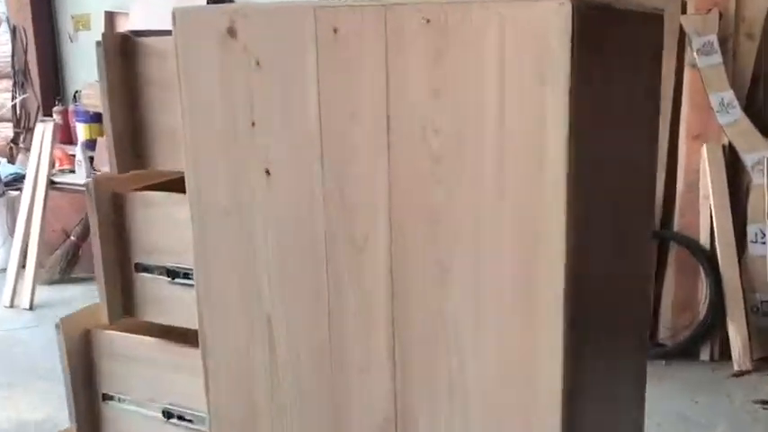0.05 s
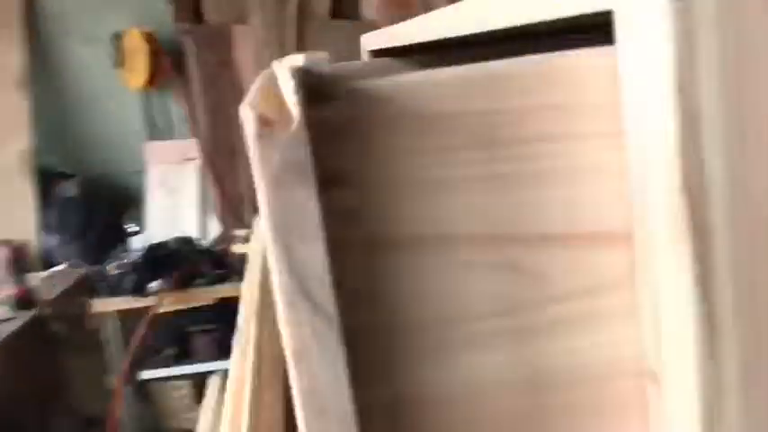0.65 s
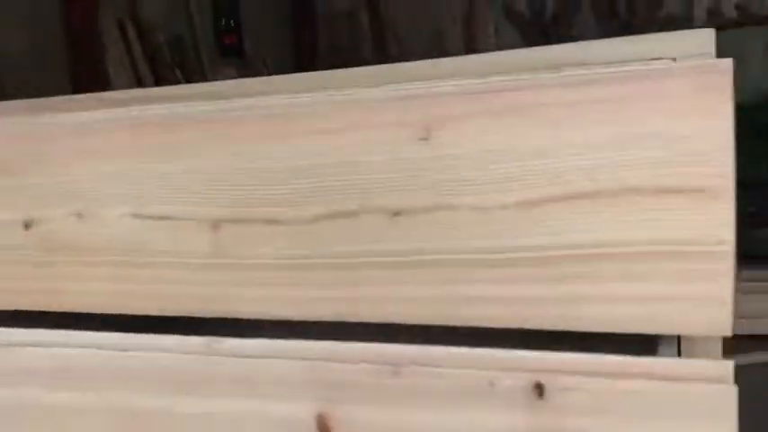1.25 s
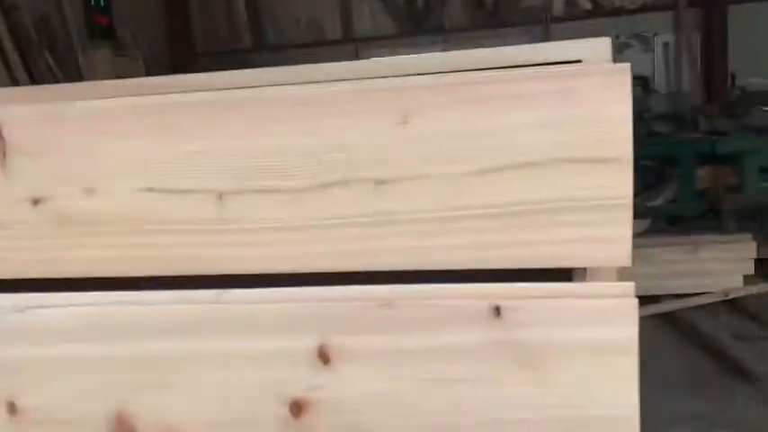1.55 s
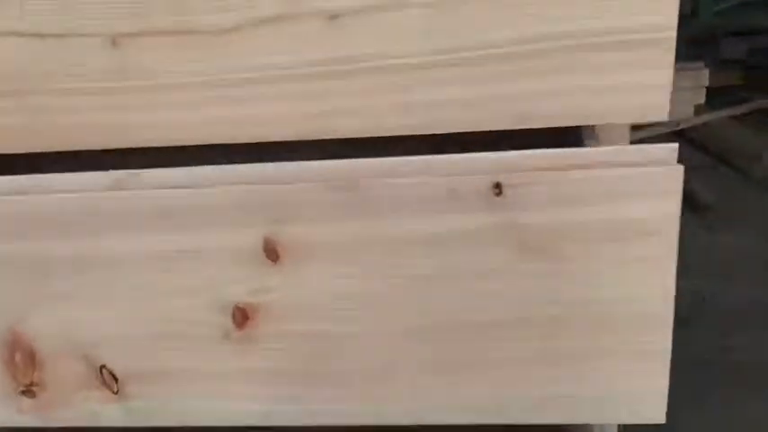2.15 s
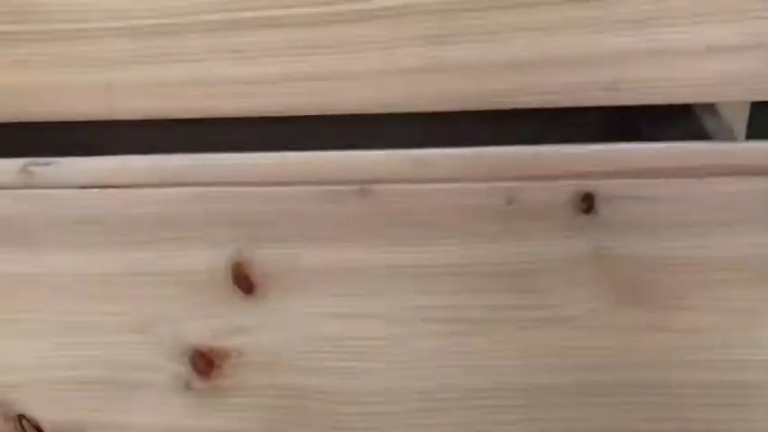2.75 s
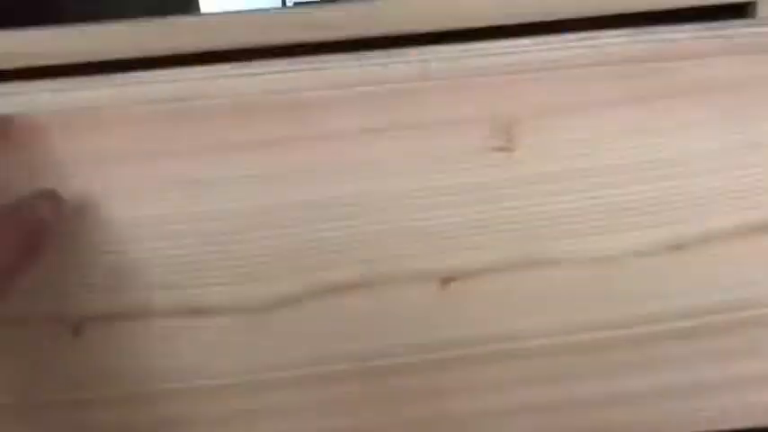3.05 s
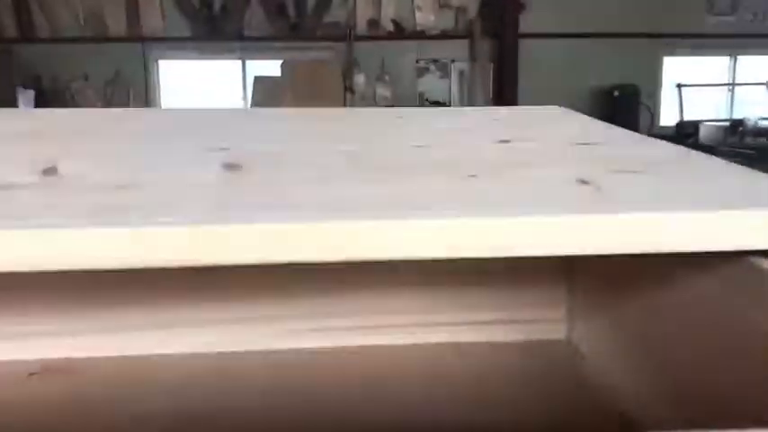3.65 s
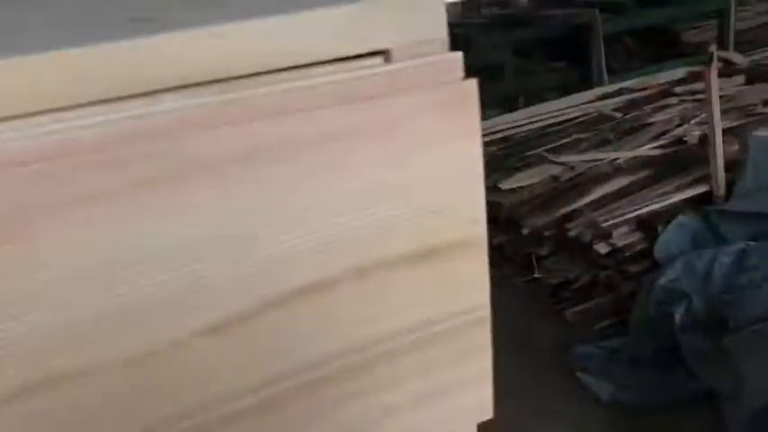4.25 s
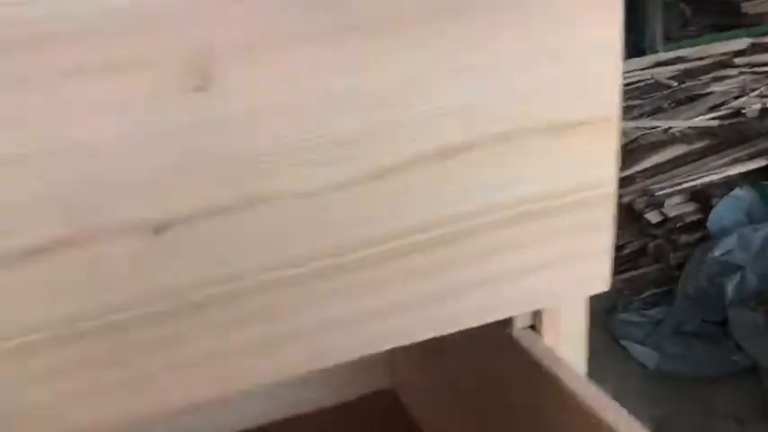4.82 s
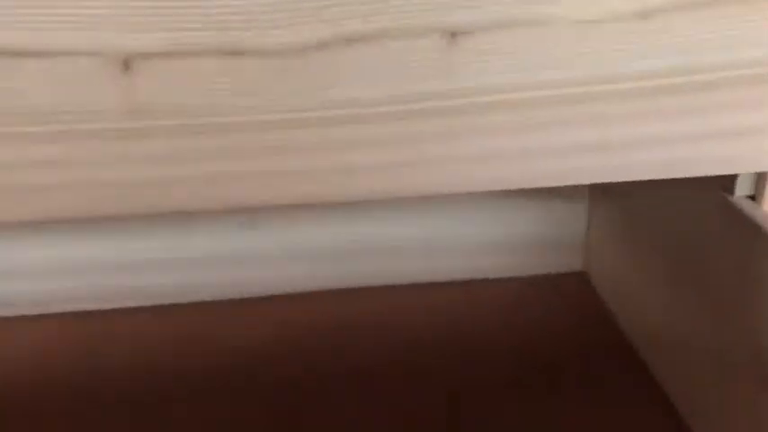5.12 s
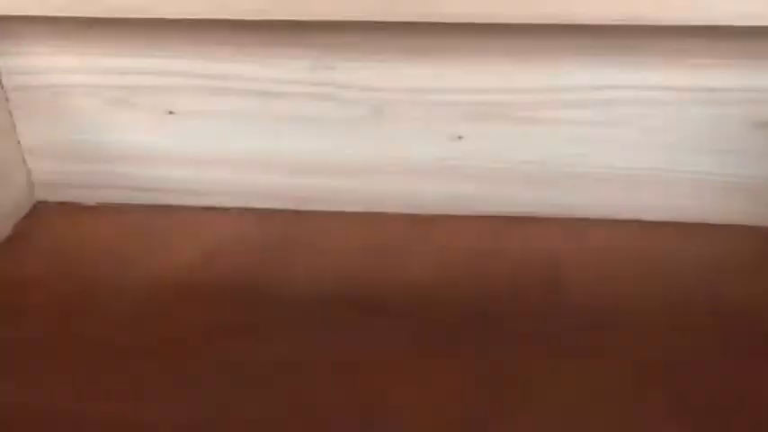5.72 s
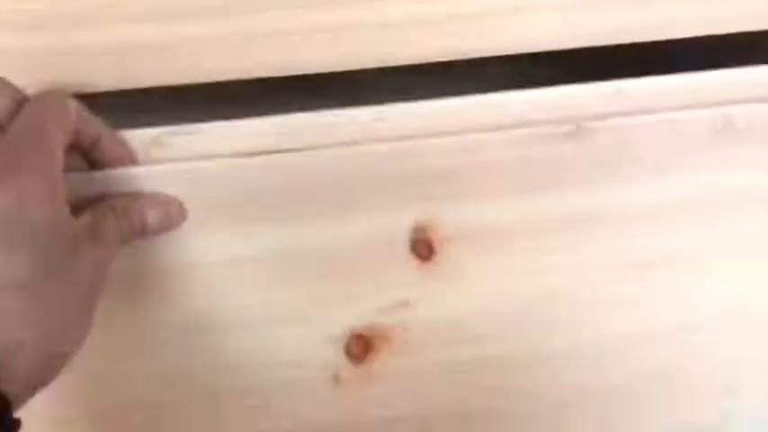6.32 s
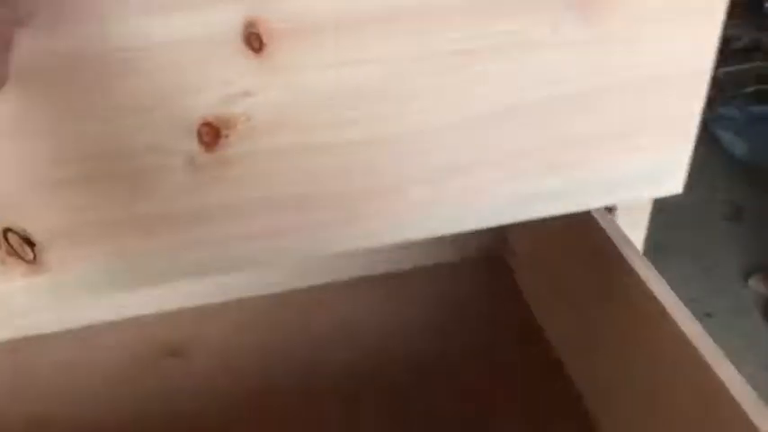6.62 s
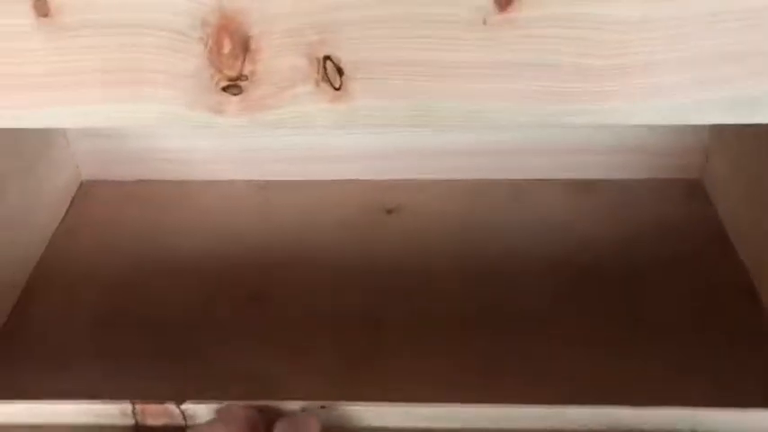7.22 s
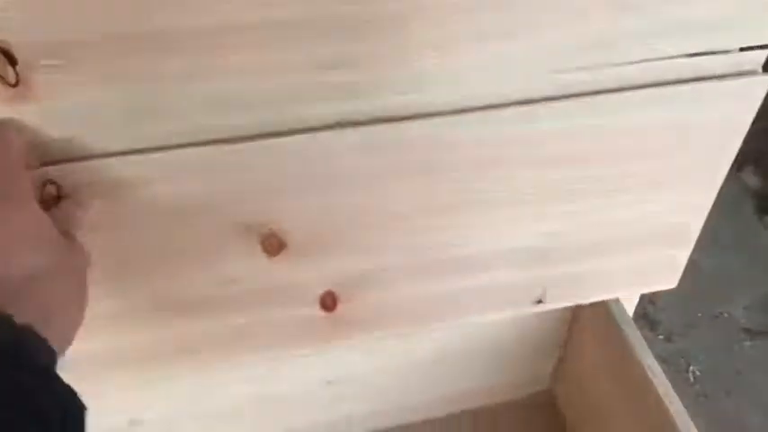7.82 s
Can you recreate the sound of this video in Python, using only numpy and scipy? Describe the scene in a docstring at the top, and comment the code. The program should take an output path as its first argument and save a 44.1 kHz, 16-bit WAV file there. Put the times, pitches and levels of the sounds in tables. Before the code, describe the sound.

A machine drones steadily in a woodshop, with a soft flutter and a hiss of air. After about three seconds, close to the microphone, the drawers of a pine chest are pulled and pushed: loud hollow knocks, clicking metal runners and short rumbling scrapes. Quieter sliding and bumps follow, then a last drawer rolls shut with a few knocks. A sleeve rustles faintly, and the room adds a short dull echo.

```python
"""A woodshop, heard from a phone held close to a pine chest of drawers. Behind it a machine's shaft
drones, its rotor flutters and its air hisses; a sleeve rustles and a faint whine comes and goes.
The metal runners click as they catch, and the drawers knock against their stops and ring the thin
panels of the chest. Rolling drawers rumble and scrape, and a bottom groans where it binds.
The shop gives the chest a short dull echo, and the phone's gain ducks after loud knocks."""
import sys
import numpy as np
from scipy import signal
from scipy.fft import rfft, irfft, next_fast_len
from scipy.io import wavfile
from scipy.ndimage import uniform_filter1d

SR = 44100
rng = np.random.default_rng(int(sys.argv[2]) if len(sys.argv) > 2 else 0)


def generate_wav(signal):
    """Clip the signal to [-1, 1] and save it as 16-bit WAV at the path in sys.argv[1]."""
    frames = np.transpose(np.atleast_2d(signal))
    scaled = np.clip(frames, -1, 1) * 32767
    pcm = np.round(scaled).astype(np.int16)
    wavfile.write(sys.argv[1], SR, pcm)


N = 351477
TIME = np.arange(N) / SR
SHAFT_HZ = 19.512

# bed of the drone's weaker harmonics: freq_hz, level_db
DRONE_EQ = [(58, -65), (80, -62.5), (135, -64), (235, -85), (275, -56), (400, -61), (520, -69.5),
            (650, -66), (750, -66.5), (900, -71.5), (1020, -72), (1160, -83), (1400, -86), (2000, -57)]
# shaft harmonics with a level of their own: harmonic_number, level_db
DRONE_NOTES = [(6, -53), (7, -52), (9, -45), (10, -48.5), (11, -55), (12, -47.5), (13, -53), (16, -47.5),
               (19, -55.5), (20, -55.5), (21, -60.5), (23, -52), (24, -46.5), (27, -59.5), (30, -71.5),
               (34, -61), (41, -60), (46, -61.5), (58, -64.5), (59, -60), (60, -64), (63, -65.5), (81, -65)]
# swells as the phone moves through the shop's standing waves, per group of harmonics: time_s, gain_db
STANDING_WAVES = { (6, 7): [(0, 9.5), (.2, 6), (.6, -2.5), (1.5, -4.5), (2.5, 0.5), (3.1, -1), (5.5, 1.5),
                  (6.3, -1), (7, -1), (7.97, -1)], (9,): [(0, 2.5), (.32, 2), (.48, 9), (.75, 3),
                  (1.05, 6.5), (1.7, -1.5), (1.97, -8), (2.25, 5.5), (2.6, 1), (3.1, 5), (3.9, 6.5),
                  (4.9, 0), (5.2, 3.5), (6.6, 3), (7, 3.5), (7.3, -5.5), (7.97, -2)],
                  (10, 11, 12, 13): [(0, 1), (.3, -1.5), (.55, 1), (.8, -3.5), (1.1, -3), (1.35, -8),
                  (2.3, -10), (3, -1.5), (4.4, -3.5), (5.2, 1.5), (6.5, 1.5), (6.95, -2), (7.97, -5)],
                  (16,): [(0, 1), (.3, 3.5), (.5, 7.5), (.9, 1), (1.07, 4.5), (1.45, -3.5), (1.8, 3),
                  (2.05, -0.5), (3, 1.5), (5.3, 2.5), (6.2, -2), (6.8, -0.5), (7.3, 0), (7.97, 1)],
                  (23, 24): [(0, -5), (.17, 2.5), (.52, -12), (1, -7), (1.5, 0), (2.5, -4.5), (4.4, -1),
                  (5.3, -6), (5.65, -13), (6.1, -2.5), (6.85, -0.5), (7.2, -3.5), (7.97, -1)],
                  (29, 30, 31, 32): [(0, 15), (.18, 13), (.4, 11), (1.5, 8), (2.3, 7), (3, 7), (5.6, -0.5),
                  (6.5, 10.5), (7.97, 11)]}
# rotor flutter, plainest while the phone faces the machine: time_s, level_db
FLUTTER_RIDE = [(0, -52), (.5, -58), (1, -53), (1.4, -46.5), (2.6, -50.5), (3.2, -48.5), (6.5, -54),
                (7.97, -52)]
# colour of the machine's rushing air: freq_hz, gain_db
AIR_EQ = [(25, -14), (48, 0), (70, 9), (170, 11.5), (300, 6.5), (480, 3), (750, 1), (1400, -3), (3200, -4),
          (5500, -6.5), (8700, -16), (9700, -20.5), (13000, -18), (15700, -27.5)]
# narrow whistles in the rush: centre_hz, width_hz, boost_db
AIR_WHISTLES = [(3270, 35, 3.5), (5470, 68, 2), (7520, 100, 5.5), (8360, 97, 4.5), (9050, 150, 6.5),
                (13900, 130, 6)]
# the rush as the phone turns towards and away from the machine: time_s, gain_db
AIR_RIDE = [(0, 1.5), (.42, 0), (.9, 0.5), (2.3, -0.14), (3.1, 1), (3.95, 1), (4.6, -0.5), (5.35, 0.6),
            (7.3, -1.5), (7.97, -1)]
# a sleeve and the hand brushing the phone: start_s, length_s, gain_db
RUSTLE_CUES = [(0.733, 0.15, -54.5), (2.445, .04, -52), (2.724, 0.036, -58), (3.742, 0.14, -56.5),
               (4.416, 0.086, -72), (5.576, 0.059, -65), (6.208, 0.052, -55), (6.71, 0.078, -58.5),
               (7.247, 0.046, -59), (7.9, 0.045, -61)]
# colour of the rustle: freq_hz, gain_db
RUSTLE_EQ = [(1200, -7), (1700, 11), (2400, -9), (3500, 7), (6000, 1), (9000, -2.5), (10000, -10),
             (15000, -13)]
# a faint high whine in the shop: start_s, length_s, gain_db
WHINE_CUES = [(1.02, 0.076, -55), (1.27, 0.18, -62)]
# the whine's two peaks: freq_hz, gain_db
WHINE_EQ = [(3130, -35), (3285, -2), (3440, -35), (5050, -45), (5380, -6), (5700, -45)]
# clicks and short rattles of runners and fittings: start_s, level_db, centre_hz, chatter_s
CLICK_CUES = [(1.593, -40.5, 6000, 0.0035), (2.205, -53, 11500, .006), (3.1, -35.5, 11900, 0.0051),
              (3.884, -50, 9000, 0.0073), (3.413, -36, 2300, 0.003), (3.4140, -29.5, 6450, 0.0057),
              (4.079, -35, 4400, 0.0071), (4.089, -26.5, 2570, 0.0028), (4.548, -31, 2740, 0.017),
              (4.589, -38, 3200, .003), (4.695, -44, 2200, .003), (5.061, -37, 2400, .002),
              (5.0613, -41.5, 9100, 0.013), (5.267, -45, 1980, 0.0094), (5.897, -39.5, 2440, 0.0083),
              (6.664, -42, 2150, 0.0053), (7.16, -59, 11000, .005), (7.411, -45, 2300, .004),
              (7.576, -41, 2300, 0.002), (7.69, -29.5, 2580, 0.0075), (7.693, -41, 8000, 0.012)]
# drawer hits, ring and crack trimmed within each: start_s, level_db, pitch_hz, t60_s, ring_db, crack_db
KNOCK_CUES = [(3.101, -19.5, 431, 0.18, -3, -6.5), (3.104, -15, 260, 0.13, -7, -24),
              (3.195, -25.5, 240, 0.084, -1, -15), (3.2968, 0, 348, 0.051, -7, -10.5),
              (3.298, -5.5, 157, 0.053, -13, -25), (3.301, -18, 1405, 0.033, -16, -21),
              (3.2985, -21, 2030, 0.014, -24, -11), (3.3, -9, 512, 0.034, -1.5, -22),
              (3.318, -23, 722, 0.073, -2, -14), (3.32, -17, 238, 0.19, -5, -22),
              (3.348, -24, 520, 0.12, -9, -22), (3.419, -19, 219, 0.15, -8, -7),
              (3.446, -22, 762, 0.088, -9, -10), (3.452, -6, 352, 0.077, -12, -24),
              (3.455, -18, 228, 0.23, -21, -25), (3.492, -16, 215, 0.13, -12, -18),
              (3.608, -10.5, 323, 0.07, -7, -38), (3.611, -22.5, 557, 0.14, -18, -19),
              (3.681, -24.5, 260, 0.062, 1, -25), (3.735, -21.5, 248, 0.071, -3.5, -20),
              (3.958, -20.5, 177, 0.087, -1.5, -10), (4.077, -7.5, 371, 0.054, -6, -15),
              (4.079, -19, 530, .05, -17, -20), (4.089, -14, 2550, 0.027, -17, -3),
              (4.088, -4.5, 235, 0.07, -5.5, -13), (4.093, -9.5, 552.6, 0.15, -20, -4),
              (4.104, -14, 150, 0.09, -11, -17), (4.108, -23, 84, .2, -14, -25),
              (4.111, -19, 420, 0.064, -8, -6), (4.139, -12, 220, 0.045, -7, -22),
              (4.151, -17, 190, 0.043, -8, -22), (4.224, -19.5, 188, 0.065, -5, -15),
              (4.539, -13.5, 404, 0.035, -3, -3), (4.541, -6.5, 163, 0.033, -20, -25),
              (4.543, -0.5, 241, 0.026, -10, -19), (4.553, -9.5, 118, 0.072, -5, -9),
              (4.556, -18.5, 917, 0.055, -4, -11), (4.57, -6, 154, 0.13, -11, -15.5),
              (4.572, -16, 375, 0.07, 1, -16), (4.589, -22.5, 520, 0.14, 7, 2),
              (4.597, -8.5, 166, 0.076, -4.5, -14.5), (4.611, -25, 595, .1, 5, -5),
              (4.635, -26.5, 418, 0.075, 2, -10), (4.699, -19, 214.4, 0.18, -6.5, -11),
              (4.7, -21.5, 130.5, 0.14, -9, -26), (4.809, -25.5, 155, 0.22, -9, -14),
              (4.975, -27, 760, 0.06, -8, -4), (4.981, -19.5, 448, 0.1, -5, -18),
              (5.063, -36, 750, .06, 2, 5), (5.92, -19.5, 350, 0.055, -5.5, -6.5),
              (5.925, -22.5, 168, 0.13, -24, -8), (5.958, -23.5, 260, .06, -12, -1),
              (6.137, -37.5, 1180, 0.031, -3, 9), (6.229, -23.5, 420, 0.063, -5, -10),
              (6.409, -24, 269, 0.17, -0.5, -11), (7.406, -14, 290, 0.032, -12, -21),
              (7.416, -11, 195, 0.056, -13.5, -26), (7.579, -19.5, 1220, 0.024, -20, -4),
              (7.580, -20, 768, 0.065, -25, -14), (7.585, -23, 128, 0.14, -12, -25),
              (7.623, -18.5, 119.3, 0.23, -16, -35), (7.693, -27.5, 123, 0.19, -5, 5),
              (7.694, -33, 674, 0.094, -5, -4)]
# ringing panels of the chest and drawers: pitch_hz, gain_db, t60_s
PANEL_MODES = [(74, 12.5, 0.13), (109.2, 3, 0.585), (129, 8.5, 0.28), (151.8, 7.5, 0.16), (171, 5.5, 0.28),
               (213.6, 5.5, 0.34), (248.7, 1, 0.25), (304.6, -4, 0.46), (333, -6.5, 0.72), (388, 2, 0.26),
               (430, 5, 0.06), (531, 1.5, 0.09), (561, 0, 0.11), (633, -6.5, 0.19), (714, -16, 0.18),
               (805, -14, 0.37), (780, -17, 0.092), (912, -6.5, 0.13), (1200, -38, .1), (1270, -11, 0.043),
               (1370, -24, 0.057), (1600, -19, 0.082)]
# dense upper modes of the boards: freq_hz, gain_db
BOARD_EQ = [(150, -37), (450, 14), (750, 8), (1050, 3), (1400, 2.5), (2200, 2), (3200, -20), (4500, -52),
            (16000, -58)]
# drawers running: start_s, length_s, rumble_gain_db, scrape_gain_db, groan_gain_db
SLIDE_CUES = [(3.639, 0.43, -41.5, -55.5, -47), (5.213, 0.12, -42, -43.5, -44.5),
              (5.885, 0.076, -46, -37.5, -52), (5.99, 0.23, -44.5, -41, -39.5),
              (6.243, 0.065, -40, -44, -36.5), (7.443, 0.14, -34, -52, -56), (7.549, 0.15, -31, -44, -61)]
# colour of the drawer box's rumble: freq_hz, gain_db
RUMBLE_EQ = [(55, -26), (85, -14), (125, -5.5), (220, -9), (320, -18.5), (700, -64)]
# colour of the runners' scrape: freq_hz, gain_db
SCRAPE_EQ = [(180, -9), (290, 1), (360, 13), (430, 0), (480, 1), (550, 8.5), (640, -35), (720, 4),
             (810, -9), (930, 1), (1060, -23), (1200, 2), (1500, -31), (3000, -13), (9000, -33)]


def undb(db):
    """Decibels to gain."""
    return 10 ** (np.asarray(db) / 20)


def unit(x):
    """Scale to rms 1."""
    return x / np.sqrt(np.mean(x ** 2))


def eq_gain(hz, curve):
    """Gain of an EQ curve, falling 20 dB an octave beyond its ends."""
    curve_hz, db = np.transpose(curve)
    octave, known = np.log2(np.maximum(hz, 1)), np.log2(curve_hz)
    beyond = np.abs(octave - np.clip(octave, known[0], known[-1]))
    return undb(np.interp(octave, known, db) - 20 * beyond)


def colour(x, curve):
    """Shape a sound with an EQ curve, at rms 1."""
    hz = np.fft.rfftfreq(len(x), 1 / SR)
    return unit(irfft(rfft(x) * eq_gain(hz, curve), len(x)))


def highpass(x, hz, order):
    """Roll off the lows."""
    return signal.sosfilt(signal.butter(order, hz, "highpass", fs=SR, output="sos"), x)


def lowpass(x, hz, order):
    """Roll off the highs."""
    return signal.sosfilt(signal.butter(order, hz, fs=SR, output="sos"), x)


def fade(t, t60):
    """Full level until t = 0, then a decay that is 60 dB down after t60."""
    return np.exp(-np.log(1000) * np.maximum(t, 0) / t60)


def ride_db(points):
    """Fader ride through (time_s, db) points."""
    return np.interp(TIME, *np.transpose(points))


def stroke(start, length, attack_s=0.025, release_s=0.064, growth_db=2):
    """Envelope that starts and stops softly and grows, like a movement gathering speed."""
    t = TIME - start
    gate = np.clip(t / attack_s, 0, 1) * np.clip(1 - (t - length) / release_s, 0, 1)
    return gate * undb(growth_db * (np.clip(t / length, 0, 1) + 1.5))


def walk(rate_hz):
    """Random drift with a spread near 1."""
    steps = rng.standard_normal(1024)
    return np.interp(TIME * rate_hz, np.arange(len(steps)), steps)


def grains(size, spread_db):
    """Dense tiny impacts of unequal strength."""
    return rng.standard_normal(size) * undb(spread_db * np.minimum(rng.exponential(size=size), 5))


def add(track, s, sound):
    """Mix a sound into a track at time s."""
    start = int(s * SR)
    track[start:start + len(sound)] += sound[:N - start]


def drone(waver_db=3.0, waver_knee_hz=280, drift_rad=0.38):
    """Harmonics of the machine's spinning shaft; each wavers alone, the higher ones more."""
    notes = {round(k): db for k, db in DRONE_NOTES}
    out = np.zeros(N)
    for k in sorted({*range(3, 66), *notes}):
        hz = k * SHAFT_HZ
        gain = undb(notes[k]) if k in notes else eq_gain(hz, DRONE_EQ)
        standing_db = sum(ride_db(ride) for group, ride in STANDING_WAVES.items() if k in group)
        unsteady = hz / (hz + waver_knee_hz)
        gain = gain * undb(standing_db + unsteady * waver_db * walk(7.6))
        phase = 2 * np.pi * (hz * TIME + rng.random()) + unsteady * drift_rad * walk(6)
        out += gain * np.sin(phase)
    return np.sqrt(2) * out


def flutter(centre_hz=430, rise_hz_per_s=7000, puff_s=0.0096, uneven_db=2.2, breathy=0.64):
    """The spinning rotor throws one soft, rising puff of air on every turn."""
    t = ((TIME * SHAFT_HZ + .5) % 1 - .5) / SHAFT_HZ  # time from the nearest puff's peak
    chirp = np.sqrt(2) * np.sin(2 * np.pi * (centre_hz * t + rise_hz_per_s * t ** 2 / 2))
    band = [(centre_hz / 2, -20), (centre_hz, 0), (centre_hz * 1.33, -4), (centre_hz * 2, -20)]
    breath = colour(rng.standard_normal(N), band)
    envelope = np.exp(-.5 * (t / puff_s) ** 2) * undb(uneven_db * walk(SHAFT_HZ))
    return unit((chirp + breathy * breath) * envelope) * undb(ride_db(FLUTTER_RIDE))


def air(level_db=-42, swell_db=-0.1, ripple_db=2.5, ripple_hz=30, places=12, flicker_db=1.0):
    """The machine's air rushes and whistles softly; its treble flickers."""
    size = next_fast_len(N)
    hz = np.fft.rfftfreq(size, 1 / SR)
    whistle_db = sum(db * np.exp(-.5 * ((hz - centre) / width) ** 2)
                     for centre, width, db in AIR_WHISTLES)
    spectrum = rfft(rng.standard_normal(size)) * undb(whistle_db) * eq_gain(hz, AIR_EQ)
    rush = np.zeros(N)
    for place in range(places):  # reflections ripple the spectrum anew as the phone moves
        ripple = np.interp(hz / ripple_hz, np.arange(4096), rng.standard_normal(4096))
        crossfade = np.maximum(1 - np.abs(np.linspace(0, places - 1, N) - place), 0)
        rush += crossfade * irfft(spectrum * undb(ripple_db * ripple), size)[:N]
    rush = unit(rush)
    treble = highpass(rush, 5000, order=1)
    rush = rush - treble + treble * undb(flicker_db * walk(11))
    return rush * undb(level_db + ride_db(AIR_RIDE) + swell_db * walk(2.53))


def rustles(uneven_db=3):
    """Cloth and skin brush in uneven patches of fine grains."""
    brush = colour(grains(N, spread_db=-2), RUSTLE_EQ) * undb(uneven_db * walk(45))
    return brush * sum(undb(db) * stroke(start, length) for start, length, db in RUSTLE_CUES)


def whine():
    """Two narrow, breathy high notes swell up briefly."""
    notes = colour(rng.standard_normal(N), WHINE_EQ)
    return notes * sum(undb(db) * stroke(start, length) for start, length, db in WHINE_CUES)


def clicks():
    """Runners catch and loose fittings chatter for a moment, then die away."""
    out, t = np.zeros(N), np.arange(SR // 6) / SR
    for start, db, hz, chatter_s in CLICK_CUES:
        t60 = 0.1 * (2500 / hz)  # smaller, higher fittings die sooner
        band = [(hz / 5, -22), (hz / 2, -5), (hz, 0), (hz * 2, -10), (hz * 5, -31)]
        chatter = colour(grains(len(t), spread_db=5.5), band)
        add(out, start, undb(db) * chatter * fade(t - chatter_s, t60))
    return out


def panel_ring(t, pitch_hz, detune=0.016):
    """The thin panels ring on, favouring modes within an octave of the struck board's pitch."""
    hz, db, t60 = np.transpose(PANEL_MODES)
    gain = undb(db) / (1 + np.log2(hz / pitch_hz) ** 2)
    gain *= (-1) ** np.arange(len(hz))  # neighbouring modes swing opposite ways: the lows arrive late
    hz = hz * (1 + detune * rng.standard_normal(len(hz)))  # modes shift with how far drawers stand out
    modes = np.sin(2 * np.pi * hz[:, None] * t) * fade(t, t60[:, None])
    return gain @ modes / np.linalg.norm(gain)


def board_crack(t, attack_s=0.00048, top_hz=3300):
    """The boards' dense upper modes give a quick snap and a darker tail."""
    boards = colour(rng.standard_normal(len(t)), BOARD_EQ)
    snap = boards * undb(2) * fade(t, t60=0.018)
    tail = lowpass(boards, 1900, order=1) * (.5 * fade(t, t60=0.15) + undb(-17) * fade(t, t60=0.18))
    crack = (snap + tail) * (1 - np.exp(-t / attack_s))
    return .5 * lowpass(crack, top_hz, order=4)  # soft pine gives no high treble


def knocks(contact_s=0.00076, lowest_hz=58):
    """Drawers bump their stops and the frame: the struck board thumps and cracks, the panels ring."""
    out, t = np.zeros(N), np.arange(SR // 2) / SR
    for start, db, pitch_hz, t60, ring_db, crack_db in KNOCK_CUES:
        thump = np.cos(2 * np.pi * pitch_hz * t) * fade(t, t60)
        ring = undb(ring_db) * panel_ring(t, pitch_hz)
        crack = undb(crack_db) * board_crack(t)
        hit = (thump + ring) * (1 - np.exp(-t / contact_s)) + crack
        hit = highpass(hit, 0.27 * pitch_hz, order=3)  # a board radiates little far below its pitch
        add(out, start, undb(db) * hit)
    return highpass(out, lowest_hz, order=4)  # the chest is too small for deep bass


def bottom_groan(pitch_hz=418, wander=0.052, judder_db=6.5):
    """A binding drawer bottom sticks and slips near one resonance; pitch and strength waver fast."""
    cycles = np.cumsum(pitch_hz * (1 + wander * walk(60))) / SR
    return unit(np.sin(2 * np.pi * cycles) * undb(judder_db * np.tanh(walk(50))))


def slides(slips_per_s=900, slip_t60_s=0.031, judder_db=0.5):
    """Uneven little slips scrape the runners and shake the drawer box, while its bottom groans."""
    slips = (rng.random(N) < slips_per_s / SR) * np.abs(grains(N, spread_db=2.0))
    slip_decay = fade(np.arange(SR // 20) / SR, slip_t60_s)
    friction = signal.fftconvolve(slips, slip_decay)[:N]
    shake = friction * rng.standard_normal(N) * undb(judder_db * walk(25))
    rumble = undb(-2) * colour(shake, RUMBLE_EQ)
    scrape = undb(-1) * colour(shake, SCRAPE_EQ)
    groan = bottom_groan()
    out = np.zeros(N)
    for start, length, rumble_db, scrape_db, groan_db in SLIDE_CUES:
        blend = rumble * undb(rumble_db) + scrape * undb(scrape_db) + groan * undb(groan_db)
        out += stroke(start, length) * blend
    return out


def shop_echo(x, wet_db=-12, dull_hz=2500, build_s=0.0072, t60_s=0.43):
    """Add the diffuse, dull echo of the cluttered workshop."""
    t = np.arange(SR) / SR
    wash = lowpass(rng.standard_normal(SR), dull_hz, order=1)
    decay = fade(t, t60_s)
    tail = wash * decay * (1 - np.exp(-(t / build_s) ** 2)) / np.linalg.norm(decay)
    return x + undb(wet_db) * signal.fftconvolve(x, tail)[:N]


def gain_control(x, threshold_db=-22.5, cut_db_per_db=0.18, attack_s=0.035, release_s=0.2):
    """The phone's gain ducks a little after a loud knock and creeps back."""
    power = uniform_filter1d(x ** 2, size=441)
    log_level = .5 * np.log(np.maximum(power, 1e-12))
    leak = TIME / release_s
    held = np.exp(np.maximum.accumulate(log_level + leak) - leak)  # peak hold that leaks away
    cut_db = cut_db_per_db * np.maximum(20 * np.log10(held) - threshold_db, 0)
    step = 1 / (attack_s * SR)
    return x * undb(-signal.lfilter([step], [1, step - 1], cut_db))


def scene():
    """The chest up front with its echo, over a bed of machine noise, in mono."""
    chest = shop_echo(knocks() + clicks() + slides())
    return (chest + rustles() + drone() + flutter() + air() + whine())[None]


def record(dry, top_hz=15700):
    """The phone rides its gain, clips at full scale and cuts the top."""
    clipped = np.clip(gain_control(dry[0]), -1, 1)
    top_cut = signal.ellip(10, .2, 80, top_hz, fs=SR, output="sos")
    return signal.sosfilt(top_cut, clipped)[None]


dry = scene()
out = record(dry)
generate_wav(out)
```